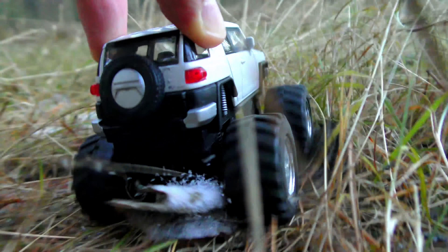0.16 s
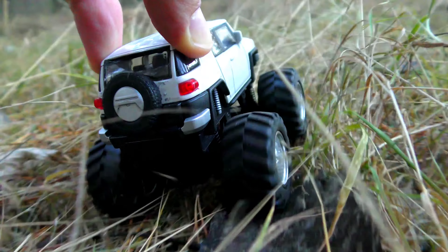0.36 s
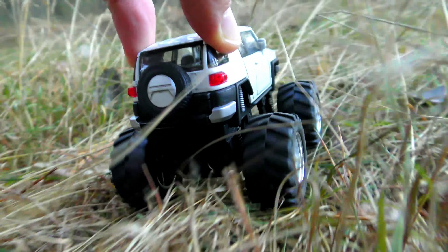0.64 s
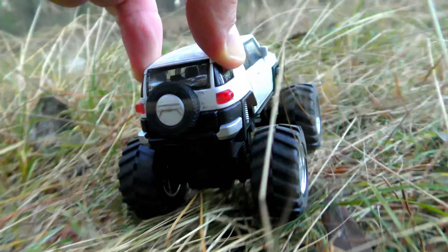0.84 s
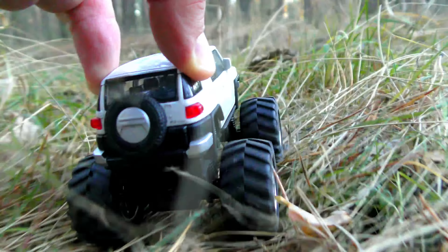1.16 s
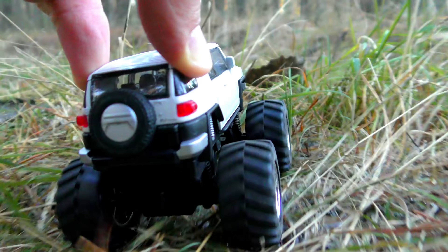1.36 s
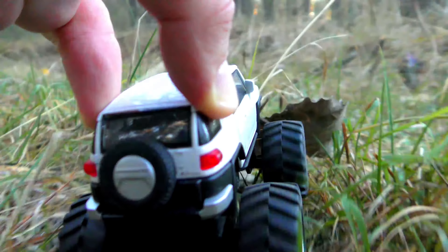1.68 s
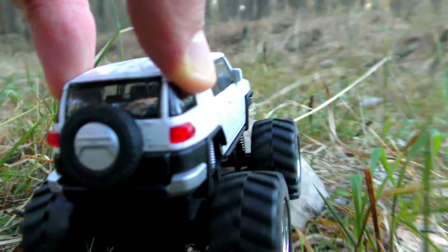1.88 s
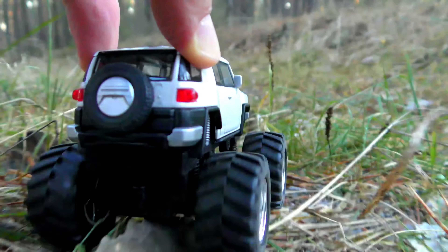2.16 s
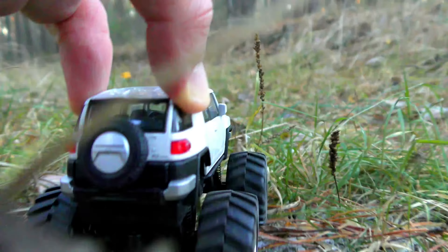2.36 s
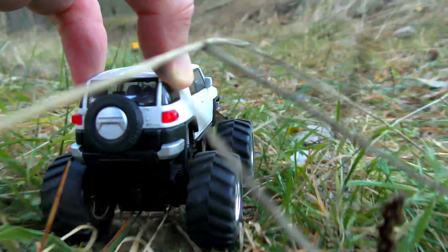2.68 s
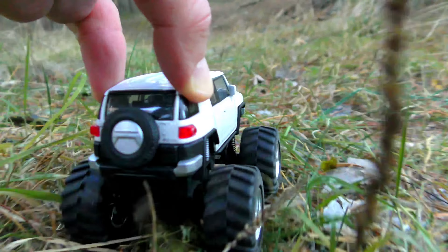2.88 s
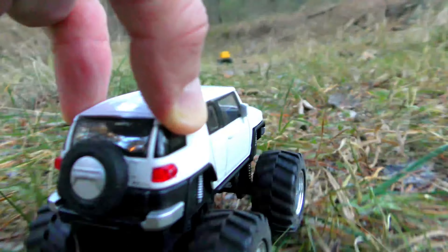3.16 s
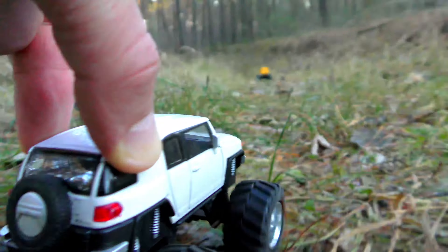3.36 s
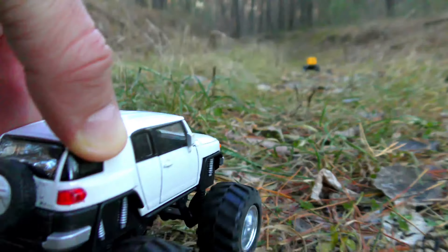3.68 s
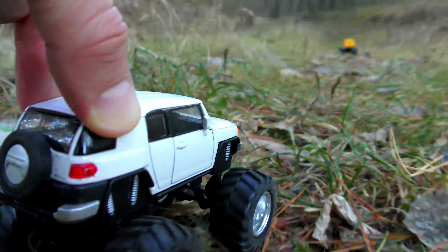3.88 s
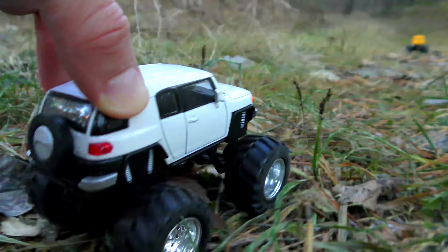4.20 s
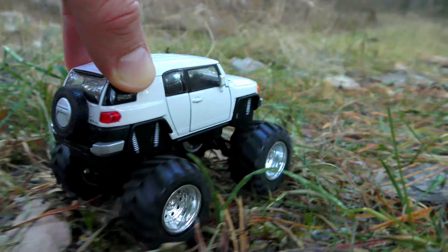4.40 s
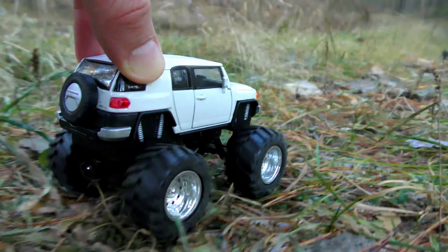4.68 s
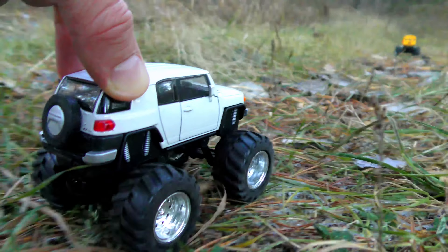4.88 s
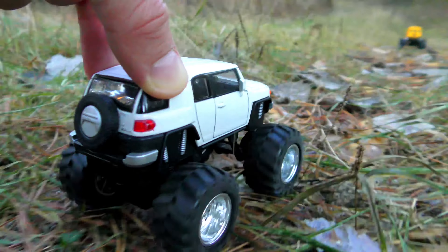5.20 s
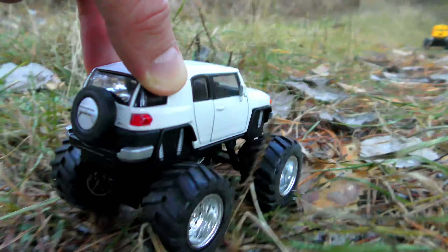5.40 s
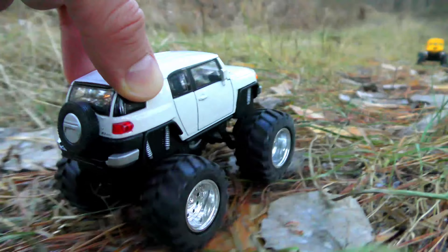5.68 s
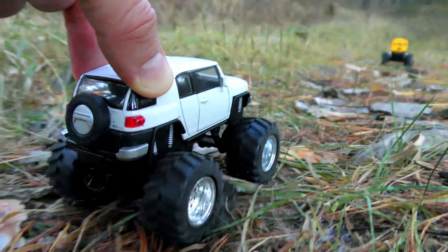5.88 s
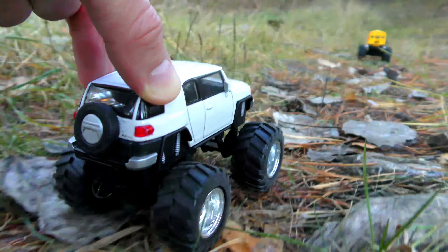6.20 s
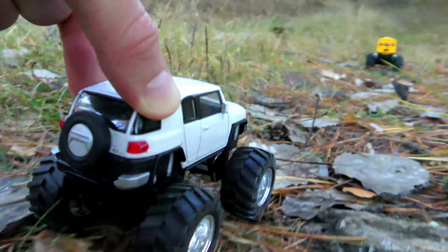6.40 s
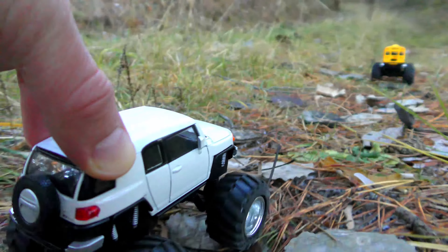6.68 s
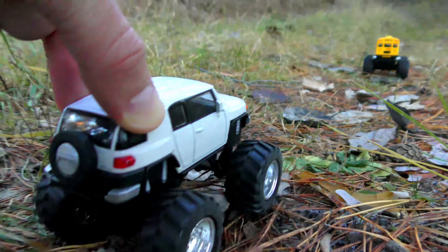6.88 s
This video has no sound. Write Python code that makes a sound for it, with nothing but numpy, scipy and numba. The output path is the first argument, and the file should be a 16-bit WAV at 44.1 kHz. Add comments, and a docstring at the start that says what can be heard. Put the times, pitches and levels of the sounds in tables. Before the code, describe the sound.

A toy truck is pushed by hand through dry grass and dead leaves, crackling, crunching and snapping stems very close to the microphone outdoors.

```python
"""In a dry forest, a toy truck is pushed by hand through grass, needles and dead leaves, close to the microphone.
Blades crackle finely, litter crunches and the hollow toy rumbles: dense damped rings and noise, coloured and swelling.
Stems snap, wheels drop with soft knocks and stalks slip along the body: timed damped rings in two ports.
The recorder ducks after loud hits; there is no echo."""
import sys
import numpy as np
from scipy import signal
from scipy.fft import rfft, irfft, next_fast_len
from scipy.io import wavfile
from scipy.ndimage import uniform_filter1d, map_coordinates
from numba import njit

SR = 44100
rng = np.random.default_rng(int(sys.argv[2]) if len(sys.argv) > 2 else 0)


def wav_record(signal):
    """Record a signal, one row per channel, as 16-bit PCM in the file named by sys.argv[1]."""
    frames = np.transpose(np.atleast_2d(signal))
    bounded = np.clip(frames, -1, 1)
    # unit amplitude maps onto the largest positive 16-bit level
    quanta = np.round(bounded * 32767).astype(np.int16)
    wavfile.write(sys.argv[1], SR, quanta)


N = 310770
TIME = np.arange(N) / SR
# steady rustle of the pushed toy, relative levels:
# (time [s], grass level [dB], litter level [dB], tyre level [dB])
PUSH = [(0, -29, -31, -32), (.3, -28, -32, -46.5), (.55, -52, -37, -51.5), (.9, -32, -42, -46.5),
        (1.3, -34, -36, -44.5), (1.62, -37.5, -38, -45.5), (1.93, -31, -27, -47), (2.12, -38, -35.5, -44),
        (2.72, -42, -43, -56.5), (2.92, -33, -37.5, -42.5), (3.8, -42.5, -40, -45),
        (4.4, -35.5, -39.5, -44), (5.1, -44, -40.5, -45), (5.6, -32.5, -33, -47), (6.1, -34, -32.5, -48.5),
        (6.5, -43.5, -40.5, -48), (6.7, -45, -45, -47.5), (7.05, -35, -29, -63)]
PUSH_S, PUSH_GRASS_DB, PUSH_LITTER_DB, PUSH_TYRES_DB = np.transpose(PUSH)


def undb(db):
    """Decibels to gain."""
    return 10 ** (np.asarray(db) / 20)


def unit(x):
    """Scale to rms 1."""
    return x / np.sqrt(np.mean(x ** 2) + 1e-18)


def colour(x, points):
    """Filter by (frequency [Hz], gain [dB]) points, joined linearly over log frequency."""
    hz, db = np.transpose(points)
    size = next_fast_len(N + 4096, True)
    bins_hz = np.fft.rfftfreq(size, 1 / SR) + 1  # +1 keeps the log finite
    gain = undb(np.interp(np.log(bins_hz), np.log(hz), db))
    return irfft(rfft(x, size) * gain, size)[..., :N]


def walk(rate_hz):
    """Random levels joined by straight lines; spread near 1."""
    levels = rng.standard_normal(N // 20)
    return np.interp(TIME * rate_hz, np.arange(N // 20), levels) * np.sqrt(3 / 2)


def steady(x):
    """Hold the level over 50 ms at 1 and keep the fast grain."""
    power = np.abs(uniform_filter1d(x ** 2, size=2201))
    return x / np.sqrt(power + 1e-12)


@njit
def rings(at_s, hz, cycles, energy):
    """A damped sine for each start time; it falls to 1 / e in the given number of cycles."""
    out = np.zeros(N)
    for k in range(len(at_s)):
        life = cycles[k] * SR / hz[k]  # samples
        start = at_s[k] * SR
        first = int(start) + 1
        pole = -1 / life + 2j * np.pi * hz[k] / SR
        z = 2 * np.sqrt(energy[k] / life) * np.exp(pole * (first - start))
        step = np.exp(pole)
        for i in range(max(first, 0), min(first + int(7 * life), N)):
            out[i] += z.imag
            z *= step
    return out


def grains(count, low_hz, high_hz, cycles, spread_db):
    """Many tiny fractures, each with its own pitch and ring; most are faint, a few stand out."""
    when, pitch, ring, size = rng.random((count, 4)).T
    size_db = -spread_db * np.log(size + .01)
    hz = low_hz + (high_hz - low_hz) * pitch
    return unit(rings(when * N / SR, hz, cycles * (.5 + ring), undb(size_db) ** 2))


def rustle(fractures, rub_db, burst_db, burst_hz):
    """Fractures over smooth rubbing, in bursts as the material gives way; a direct and a scattered part."""
    bursts = undb(burst_db * (walk(burst_hz) + walk(burst_hz * np.pi)))
    rub = undb(rub_db) * rng.standard_normal(N)
    direct = steady((fractures + rub) * bursts)
    # by way of ground and toy: separate noise that swells with the same bursts
    envelope = np.sqrt(np.abs(uniform_filter1d(steady(direct) ** 2, size=45)))
    scattered = rng.standard_normal(N) * envelope
    return np.array([direct, scattered])


def patchy(x, depth_db, leaf_hz, leaf_s):
    """Every leaf has resonances of its own, so the colour changes as one after another is touched."""
    spec = signal.stft(x, nperseg=512)[2]
    bins, frames = np.indices(spec.shape[1:])
    where = [bins * SR / 512 / leaf_hz, frames * 256 / SR / leaf_s]
    shade = map_coordinates(rng.standard_normal((256, 1024)), where, order=1, mode="wrap")
    return signal.istft(spec * undb(depth_db * shade), nperseg=512)[1][:, :N]


def swells(events, rise, shape):
    """Power of swells: each builds for the share `rise` of its length, then lets go; ends lie 10 dB down."""
    power = np.zeros(N)
    for at_s, length_s, db in events:
        near = slice(max(int((at_s - 2 * length_s) * SR), 0), int((at_s + 2 * length_s) * SR))
        u = (TIME[near] - at_s) / length_s
        fall = np.maximum(-u / rise, u / (1 - rise)) ** shape
        power[near] += undb(db - 10 * fall) ** 2
    return power


def course(push_db, events, steady_db, rise, shape):
    """Gain of a rustle over time: the steady push, with its swells on top."""
    push = undb(steady_db + np.interp(TIME, PUSH_S, push_db))
    return np.sqrt(push ** 2 + swells(events, rise, shape))


def uneven(depth_db, rate_hz):
    """The toy moves in small jerks as the ground catches and releases it."""
    return undb(depth_db * walk(rate_hz))


def aside(at_s):
    """Scale of the difference between the ports; a spot straight ahead reaches both alike."""
    # how far off the microphone's axis the rustling spot lies: (time [s], difference scale [dB])
    off_axis_points = [(0, -1), (.44, -13), (.6, -8), (1.2, 3.5), (1.42, -4), (1.7, -2.5), (2, -8),
                       (2.58, 2.5), (2.8, -4.5), (3.22, -5), (3.36, 0.5), (3.65, 2.5), (4.3, -4),
                       (4.72, 2.5), (5.52, -5.5), (5.87, 2), (6.2, -6), (7.05, 0)]
    return undb(np.interp(at_s, *np.transpose(off_axis_points)))


def place(pair, points, gain, gain_db, side_db, left_db, follow, focus):
    """Colour a rustle, set its course and spread it over two ports; loud moments come more from one spot."""
    # unlikeness of the two ports: (frequency [Hz], relative side gain [dB])
    side_colour = [(50, -6), (120, -6.5), (350, -10.5), (700, -10), (1300, -3), (2400, -3.5), (4400, -6),
                   (8000, -25), (11000, -9), (15000, -8)]
    mid, scattered = colour(pair, points)
    scale = undb(gain_db) * gain / np.std(mid)
    off_axis = aside(TIME) ** follow
    spread = undb(side_db) * (np.median(gain) / gain) ** focus
    lean = (undb(left_db / 2) - 1) * off_axis ** .5 * mid
    side = off_axis * (spread * colour(scattered, side_colour) + lean)
    return scale * np.array([mid + side, mid - side])


def ports(at_s, hz, cycles, energy, lag_s=1.6e-5, left_db=2.0):
    """Rings reach the ports at slightly different times, the left a little louder."""
    lag = lag_s * aside(at_s) * rng.uniform(-2.1, 1, len(at_s)) * np.sqrt(2000 / hz)
    cycles = np.full(len(at_s), float(cycles))
    lean_db = left_db * aside(at_s)
    return np.array([rings(at_s + s * lag, hz, cycles, energy * undb(s * lean_db)) for s in (1, -1)])


def grass():
    """Thin dry blades flick against the toy in a very high crackle; tufts bend and spring free."""
    # filter: (frequency [Hz], gain [dB])
    blade_colour = [(1500, -7.5), (3500, -3.5), (5200, -4.5), (7000, -5), (8600, -1.5), (10500, 1.5),
                    (13000, -1), (15800, -9)]
    # a tuft bends against the toy and springs free: (peak time [s], length [s], relative level [dB])
    tuft_swells = [(0.004, 0.08, -25.0), (0.175, 0.14, -23.5), (0.43, 0.067, -28), (0.53, 0.028, -30),
                   (0.662, 0.27, -31.5), (1.085, 0.084, -30.5), (1.27, 0.025, -27), (1.365, 0.081, -27.0),
                   (1.517, 0.053, -32), (1.873, 0.21, -31), (1.999, 0.099, -28), (2.342, 0.11, -27),
                   (2.65, 0.16, -30), (2.8, 0.07, -38), (3.054, 0.02, -27), (3.116, 0.039, -30),
                   (3.2, 0.034, -30), (3.37, 0.08, -26.5), (3.497, 0.07, -35), (3.608, 0.052, -34.5),
                   (3.935, 0.14, -35), (4.468, 0.11, -36), (4.56, 0.056, -30.5), (4.733, 0.081, -37.5),
                   (5.119, 0.027, -32), (5.523, 0.062, -23), (5.987, 0.122, -27.5), (6.05, 0.075, -29.0),
                   (6.223, 0.035, -27), (6.287, 0.098, -30.0), (6.816, 0.11, -26.5), (6.916, 0.031, -30),
                   (6.993, 0.02, -29.5)]
    flicks = grains(count=15000, low_hz=3980, high_hz=16770, cycles=2.9, spread_db=4.5)
    flicks = rustle(flicks, rub_db=3, burst_db=1.82, burst_hz=56)
    sound = patchy(flicks, depth_db=4.0, leaf_hz=465.0, leaf_s=.022)
    gain = course(PUSH_GRASS_DB, tuft_swells, steady_db=0.2, rise=0.52, shape=1.54)
    gain = gain * uneven(depth_db=1.64, rate_hz=24)
    return place(sound, blade_colour, gain, gain_db=-0.54, side_db=2, left_db=0.7, follow=0.4, focus=0.3)


def litter():
    """Dead leaves and needles crush under the tread in lower fractures that ring for fewer cycles."""
    # filter: (frequency [Hz], gain [dB])
    leaf_colour = [(300, -59), (850, -13.5), (1300, -1), (1800, 0.5), (2250, 3.5), (2650, -2), (3700, -1.5),
                   (5000, -5.5), (7000, -10), (14000, -21)]
    # a tyre presses a dead leaf flat: (peak time [s], length [s], relative level [dB])
    crunch_swells = [(0.185, 0.096, -32), (0.34, 0.041, -27.5), (0.417, 0.04, -42), (0.534, 0.056, -36),
                     (1.35, 0.17, -37.5), (1.502, 0.074, -34), (1.743, 0.038, -27.5), (1.984, 0.17, -33),
                     (2.09, 0.02, -27), (2.13, 0.089, -36), (2.222, 0.15, -32.5), (2.348, 0.043, -35),
                     (2.431, 0.021, -26.5), (2.94, 0.11, -32), (3.063, 0.04, -29.5), (3.134, 0.032, -27.5),
                     (3.213, 0.1, -31), (3.493, 0.04, -35.5), (3.629, 0.051, -27), (3.752, 0.091, -38),
                     (3.925, 0.073, -40), (4.275, 0.24, -32.5), (4.417, 0.017, -28.5), (4.52, 0.1, -34),
                     (4.723, 0.054, -33.5), (4.946, 0.097, -37), (5.022, 0.016, -33), (5.122, 0.03, -34.5),
                     (5.166, 0.015, -32.5), (5.249, 0.018, -30), (5.54, 0.017, -22.5),
                     (5.824, 0.066, -27.5), (6.175, 0.061, -30), (6.27, 0.078, -33.5), (6.397, 0.034, -25),
                     (6.711, 0.013, -29), (6.797, 0.02, -32), (6.802, 0.24, -34), (6.922, 0.081, -29.0)]
    crunch = grains(count=9000, low_hz=710, high_hz=7050, cycles=2, spread_db=3.0)
    crunch = rustle(crunch, rub_db=4.0, burst_db=2.5, burst_hz=44)
    sound = patchy(crunch, depth_db=3.0, leaf_hz=365, leaf_s=.02)
    gain = course(PUSH_LITTER_DB, crunch_swells, steady_db=-0.33, rise=0.5, shape=2.5)
    gain = gain * uneven(depth_db=1.33, rate_hz=26)
    return place(sound, leaf_colour, gain, gain_db=-1.0, side_db=-1.0, left_db=3.5, follow=1.6, focus=0.11)


def tyres():
    """Tread blocks scuff the soil and the hollow toy passes it on as a low grumble."""
    # filter: (frequency [Hz], gain [dB])
    roll_colour = [(25, -39), (60, -7.5), (120, -3.5), (230, 0), (360, 3), (520, -1), (700, 0.5), (860, -3),
                   (1150, 2), (1600, -4.5), (3000, -6.5)]
    # a tyre scuffs over a hump in the soil: (peak time [s], length [s], relative level [dB])
    scuff_swells = [(0.064, 0.028, -33.5), (0.362, 0.081, -40.5), (0.687, 0.11, -33), (0.805, 0.18, -43.5),
                    (1.192, 0.081, -25.0), (1.305, 0.082, -32), (1.738, 0.093, -31), (1.894, 0.14, -30),
                    (2.014, 0.082, -33.5), (2.392, 0.18, -38.5), (2.583, 0.15, -40), (2.867, 0.054, -33),
                    (2.94, 0.101, -33.5), (3.197, 0.059, -37), (3.36, 0.043, -34), (3.523, 0.033, -32.5),
                    (3.634, 0.12, -35.5), (4.139, 0.07, -30), (4.249, 0.11, -34), (4.729, 0.065, -36),
                    (4.87, 0.16, -34.5), (5.31, 0.28, -34.5), (5.807, 0.25, -37.5), (6.408, 0.085, -29),
                    (6.56, 0.28, -39), (6.924, 0.044, -26), (7.04, 0.25, -37.5)]
    scuffs = grains(count=4000, low_hz=103.8, high_hz=1541, cycles=1.6, spread_db=2.0)
    sound = rustle(scuffs, rub_db=4.5, burst_db=1.17, burst_hz=49)
    gain = course(PUSH_TYRES_DB, scuff_swells, steady_db=0.4, rise=0.52, shape=1.6)
    gain = gain * uneven(depth_db=1.68, rate_hz=22)
    return place(sound, roll_colour, gain, gain_db=0.7, side_db=6.0, left_db=0.6, follow=0.45, focus=.05)


def bumps(cycles=0.45, shell_db=-13, shell_hz=900):
    """A soft tyre lands: a heavily damped thud and a short knock of the shell."""
    # wheels dropping onto the ground: (time [s], relative level [dB], pitch [Hz])
    drops = [(0.06, -26.5, 377), (0.0937, -25, 220), (0.3608, -28.5, 338), (0.6619, -17, 160),
             (.6961, -27.5, 400), (.803, -31, 300), (1.2058, -25, 544), (1.214, -6.5, 252),
             (1.696, -29, 300), (1.752, -24.5, 330), (2.0183, -24, 370), (2.199, -27, 173),
             (2.2338, -32, 410), (2.434, -22, 121), (2.4537, -20.5, 250), (2.858, -30, 348),
             (3.649, -27.5, 150), (3.8925, -29.5, 334), (4.048, -31, 377), (4.1477, -26, 310),
             (4.256, -27.5, 400), (4.7221, -28, 120), (6.3855, -25, 105), (6.921, -29, 420),
             (6.949, -32, 100)]
    at_s, db, hz = np.transpose(drops)
    energy = undb(db) ** 2 * SR / 1000
    thud = ports(at_s, hz, cycles, energy, lag_s=5e-5)
    knock_hz = shell_hz * np.exp(0.33 * rng.standard_normal(len(at_s)))
    shell = ports(at_s, knock_hz, 0.31, energy * undb(shell_db) ** 2, lag_s=5e-5)
    return colour(thud + shell, [(25, -46), (60, -5.5), (130, 3.0), (1200, 9.5), (2500, -41)])


def needles(count=60, crack_db=-29, ring_db=-29, spread_db=1.0, ring_hz=2600):
    """Thin needles break faintly at random: rows of (time [s], crack [dB], ring [dB], ring [Hz])."""
    when, crack, ring, pitch = rng.random((count, 4)).T
    cracks_db = crack_db + spread_db * (2 * crack - 1)
    rings_db = ring_db + spread_db * (2 * ring - 1)
    return np.transpose([when * N / SR, cracks_db, rings_db, ring_hz * 2 ** (2 * pitch - 1)])


def snaps(crack_hz=11500, splinter_s=.0018, splinter_db=-14):
    """A stem parts with a sharp crack and the piece rings briefly; fibres tear just before and after."""
    # louder stems and twigs: (time [s], relative crack level [dB], relative ring level [dB], ring pitch [Hz])
    stems = [(0.067, -15, -27, 2260), (.1661, -12.5, -33, 4530), (0.3568, -19.5, -18, 3220),
             (.397, -21, -22, 4230), (0.423, -21, -10.5, 1800), (.449, -8, -23, 3500),
             (0.4696, -14, -21, 3640), (0.532, -23, -19, 2700), (0.6193, -18, -39, 1230),
             (0.942, -19, -53, 2170), (1.093, -30, -31, 2010), (1.3675, -11.5, -39, 4540),
             (1.4112, -17, -23, 3960), (1.5018, -20.5, -37, 2100), (1.5359, -12.5, -51, 5600),
             (1.8731, -18, -21, 1190), (2.0189, -5.5, -7, 1700), (2.0328, -13, -5.5, 2240),
             (2.054, -15, -7.5, 1880), (2.0967, -20, -17, 1660), (2.1274, -16.5, -21, 1720),
             (2.1387, -20, -13.5, 1980), (2.164, -11.5, -25, 2120), (2.173, -34, -20.5, 1450),
             (2.1936, -20, -27, 2210), (2.2364, -15.5, -16, 3660), (2.2753, -22, -18, 1390),
             (2.4288, -22, -15.5, 1640), (2.4358, -16, -7.5, 4060), (2.6105, -27, -21.5, 4650),
             (2.6405, -18, -46, 5390), (2.7768, -18.5, -51, 4240), (2.93, -25, -15.5, 1840),
             (3.0425, -16, -27, 3990), (3.135, -19, -25, 1540), (3.2324, -32, -23, 1430),
             (3.6346, -21, -19.5, 2200), (3.786, -23, -33, 4610), (4.2776, -35, -22, 2550),
             (4.4459, -22, -42, 3590), (5.434, -19.5, -39, 3660), (5.5305, -15, -20, 4300),
             (5.5844, -38, -18.5, 2240), (5.6715, -18, -18, 1500), (5.7017, -23, -17.5, 2960),
             (5.7962, -23, -19.5, 3400), (5.9882, -22, -24, 2360), (6.025, -16, -26, 3630),
             (6.1644, -26, -24, 1730), (6.2237, -13.5, -28, 4850), (6.3967, -30, -22, 2480),
             (6.4617, -19, -36, 4850), (6.7987, -31, -29, 3810), (6.9876, -13, -33, 4420)]
    at_s, crack_level_db, ring_level_db, hz = np.vstack([stems, needles()]).T
    crack = undb(crack_level_db) ** 2 * SR / 1000
    ring = undb(ring_level_db) ** 2 * SR / 1000
    pitch_hz = crack_hz * np.exp(.1 * rng.standard_normal(len(at_s)))
    out = ports(at_s, pitch_hz, 3.2, .65 * crack)
    out = out + ports(at_s + .0002, hz, 1.5, .7 * ring)
    # the break itself is a step: a broad, heavily damped pulse
    out = out + ports(at_s, np.full(len(at_s), 5600.), .8, .17 * np.sqrt(crack * ring))
    for _ in range(6):
        when, pitch, overtone = rng.random((3, len(at_s)))
        tear_s = at_s + splinter_s * (2 * when - .5)
        out = out + ports(tear_s, crack_hz * (0.624 + .75 * pitch), 5.0, crack * undb(splinter_db) ** 2)
        out = out + ports(tear_s, hz * 2 ** (2 * overtone - .7), 1, ring * undb(-14) ** 2)
    return colour(out, [(40, -24), (600, -5), (1200, 0)])


def scrapes(gain_db=-1):
    """A stalk slips along the body in quick uneven steps, each ringing it near the same pitch."""
    # sticking and slipping stalks: (start time [s], length [s], relative level [dB], centre pitch [Hz])
    slides = [(.2685, 0.0046, -18, 2200), (.321, 0.0094, -15.5, 2000), (.527, 0.0083, -37, 2720),
              (1.88, 0.17, -29.5, 1525), (2.081, .009, -32, 10800), (2.7595, 0.0052, -21, 2140),
              (2.807, .006, -31, 2220), (3.205, 0.038, -28, 4150), (3.293, 0.0091, -33, 8400),
              (3.35, 0.088, -33.5, 6700), (3.918, 0.032, -32, 7400), (3.944, 0.029, -31.5, 7000),
              (3.922, 0.016, -31, 2160), (4.036, 0.025, -34, 7100), (4.21, .09, -36, 695),
              (4.43, 0.064, -29.5, 12000), (5.108, 0.017, -34, 10900), (5.53, 0.016, -28, 1820),
              (5.621, .013, -32, 9600), (5.81, 0.092, -30, 4800), (6.385, .014, -33, 1900),
              (6.785, 0.061, -29, 3730), (6.905, 0.046, -34, 1070)]
    at_s, length_s, db, hz = np.repeat(slides, 32, axis=0).T  # 32 slips each
    when = rng.beta(2, 2, len(at_s))
    energy = undb(db + gain_db) ** 2 * length_s * SR / 32
    # over a long slide the contact travels along the stalk, so its pitch scatters more
    pitch_hz = hz * np.exp((.03 + 1.2 * length_s) * rng.standard_normal(len(at_s)))
    return colour(ports(at_s + length_s * when, pitch_hz, 7.2, energy), [(60, -37), (600, -1.5)])


def gain_control(x, top_db, ratio, sense_s, release_s):
    """The recorder turns itself down after a loud hit and recovers quickly."""
    pole = np.exp(-1 / (sense_s * SR))
    power = signal.lfilter([1 - pole], [1, -pole], np.mean(x ** 2, axis=0)) + 1e-12
    fade = 2 * TIME / release_s
    # peak hold whose level decays to 1 / e in release_s
    held = np.exp((np.maximum.accumulate(np.log(power) + fade) - fade) / 2)
    return x * np.minimum(undb(top_db) / held, 1) ** (1 - 1 / ratio)


def scene():
    """Sum of all sources, right in front of the microphone."""
    return grass() + litter() + tyres() + bumps() + snaps() + scrapes()


def record(dry):
    """The recorder drops the deepest bass, ducks after hits, clips at full scale and cuts the top."""
    sound = signal.sosfilt(signal.butter(2, 28, "high", fs=SR, output="sos"), dry)
    sound = gain_control(sound, top_db=-20, ratio=3.3, sense_s=0.0054, release_s=0.16)
    sound = np.clip(sound, -1, 1)
    top_hz = 15900
    return signal.sosfiltfilt(signal.ellip(10, .05, 50, top_hz, fs=SR, output="sos"), sound)


dry = scene()
out = record(dry)
wav_record(out)
```